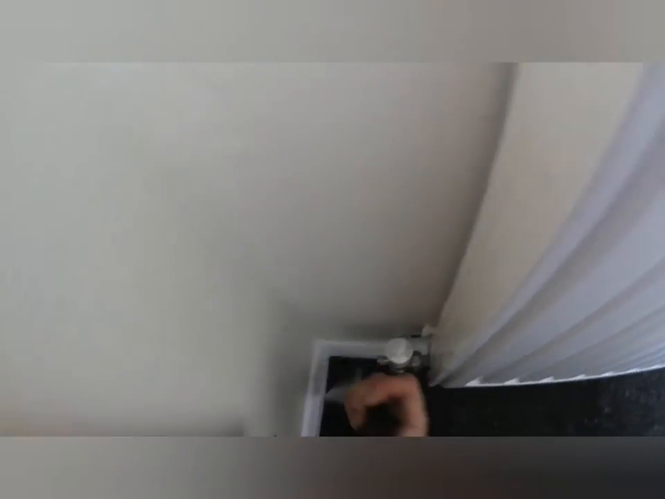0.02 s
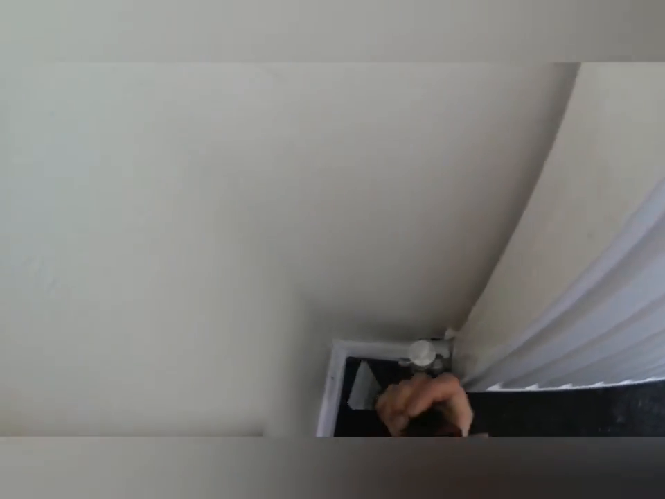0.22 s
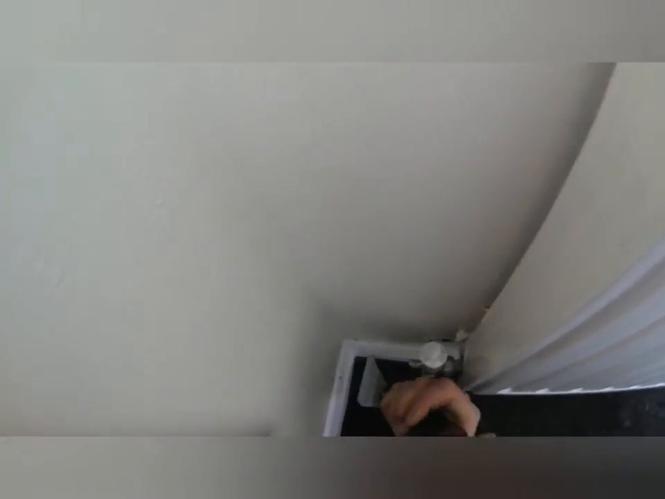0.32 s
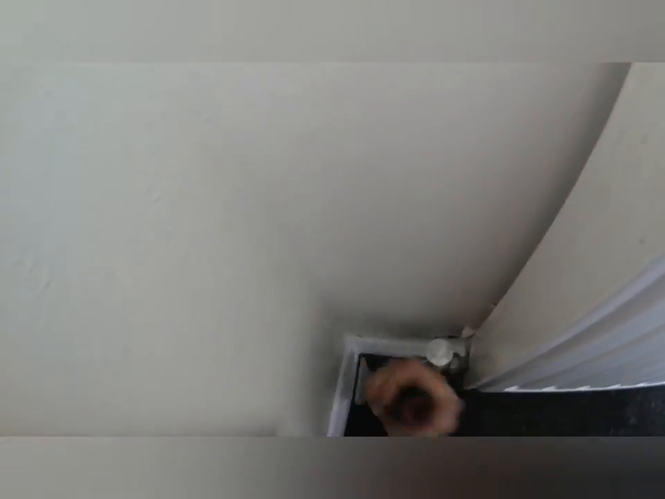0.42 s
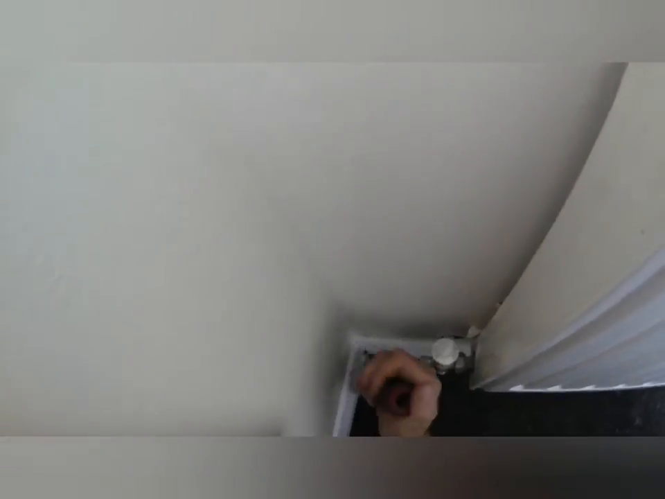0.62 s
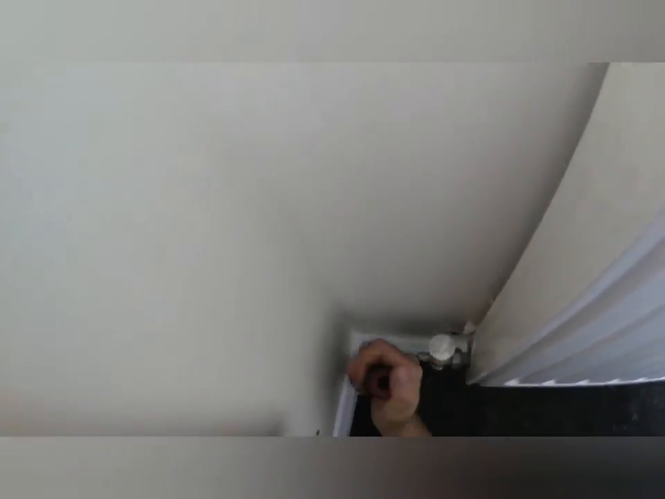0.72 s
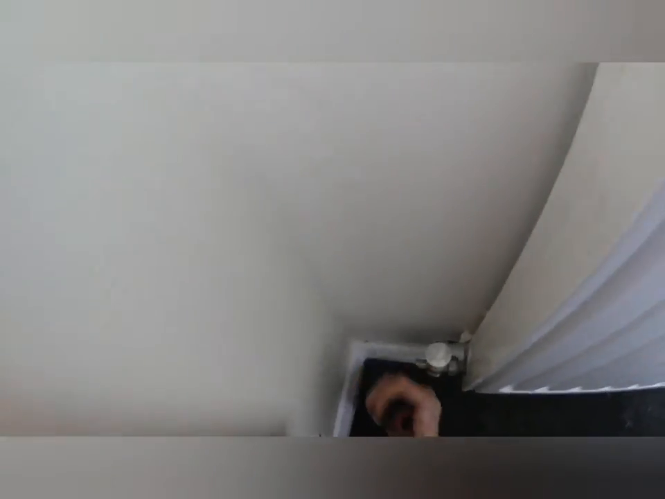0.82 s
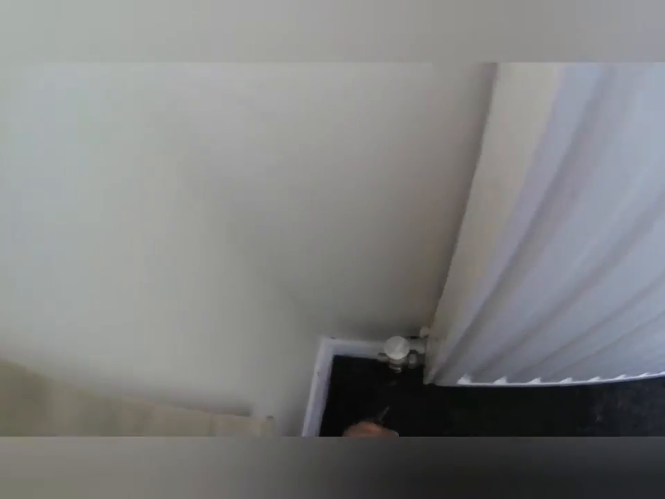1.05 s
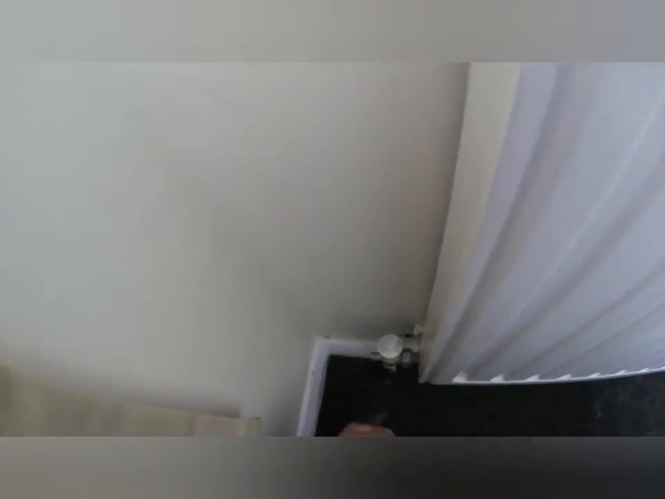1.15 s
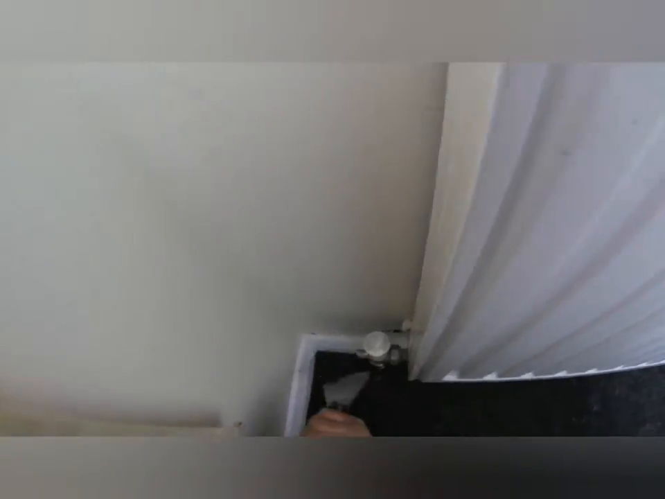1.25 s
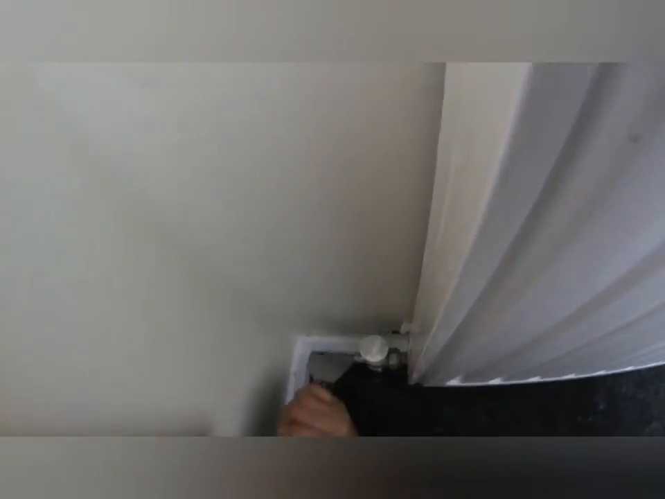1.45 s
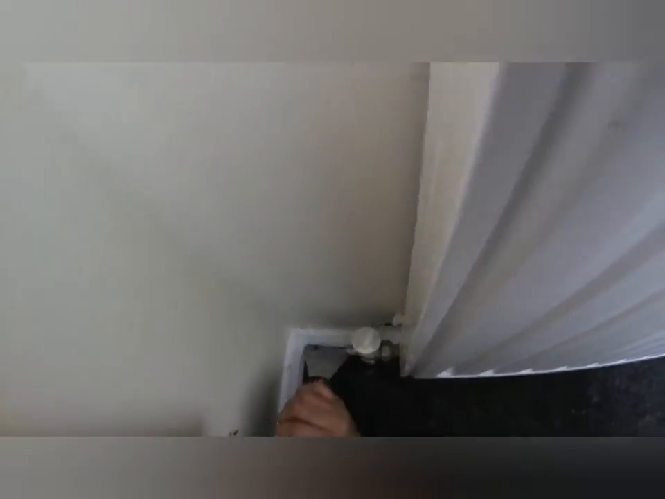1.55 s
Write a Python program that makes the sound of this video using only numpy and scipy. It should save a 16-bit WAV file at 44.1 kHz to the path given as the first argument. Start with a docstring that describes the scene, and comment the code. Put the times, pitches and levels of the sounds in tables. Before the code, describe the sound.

Dull thump of carpet pressed down beside a booming radiator, followed by a hard tool knock

```python
"""A hand shoves a carpet edge down in a corner: the floor shakes as noise in resonances, led by a judder,
and a steel radiator panel booms, a swelling 50 Hz sine with a noisy second mode.
A flat tool knocks, clicks and rings as decaying sines; its ticks and its scuff on the pile are shaped noise.
Behind them a microphone adds hiss, motor chatter, a thin wavering whine and low rumble from slow pushes."""
import sys
import numpy as np
from scipy.fft import rfft, irfft, next_fast_len
from scipy.io import wavfile
from scipy.ndimage import map_coordinates

SR = 44100
rng = np.random.default_rng(int(sys.argv[2]) if len(sys.argv) > 2 else 0)


def dump(signal):
    """Clip the signal to [-1, 1] and save it as 16-bit WAV at the path in sys.argv[1]."""
    limited = np.clip(np.atleast_2d(signal).T, -1, 1)
    pcm = np.round(limited * 32767).astype(np.int16)
    wavfile.write(sys.argv[1], SR, pcm)


N = 70560

# Hiss and chatter gain. Each row: time in seconds, shared gain in dB.
HISS_GAIN = [(0, -85.5), (.09, -84), (.16, -93.5), (.2, -94), (.3, -76), (.55, -79.5), (1, -84),
             (1.17, -82), (1.22, -80), (1.28, -85), (1.38, -80.5), (1.6, -82.5)]
# Hiss spectrum. Each row: frequency in Hz, relative density in dB.
HISS_COLOUR = [(410, -55), (700, 1.5), (1360, -5), (2320, -10), (8080, -19.5), (15700, -20.5)]
# Whine. Each row: time in seconds, mean level in dB.
WHINE_LEVEL = [(0, -88.5), (.5, -82), (1.06, -86), (1.11, -86), (1.6, -91)]
# Slow pushes on the microphone. Each row: time in seconds, level in dB.
SWAY_LEVEL = [(0, -50.5), (.05, -51), (.12, -55), (.17, -79), (.22, -34), (1.05, -57), (1.15, -43.5),
              (1.26, -64), (1.32, -46), (1.38, -61.5), (1.48, -50.5), (1.6, -61)]

# Rubbing on the pile. Each row: time in seconds, level in dB.
SCUFF_LEVEL = [(.06, -81), (.11, -97), (.158, -88), (.17, -54), (.205, -48.5), (.3, -51), (.325, -54),
               (.37, -56.5), (.44, -65), (.51, -64.5), (.56, -75.5), (.85, -72.5), (1.08, -87),
               (1.1, -48.5), (1.12, -66), (1.15, -45.5), (1.21, -60), (1.28, -73.5), (1.33, -70.5),
               (1.38, -82), (1.41, -66.5), (1.47, -65.5), (1.52, -62.5), (1.6, -72.5)]
# Scuff spectrum. Each row: frequency in Hz, relative density in dB.
PILE_COLOUR = [(500, -0.5), (800, 7.5), (1300, 2.5), (1600, -9), (2300, -19.5), (3800, -14.5), (4500, -28),
               (7000, -31), (10000, -45)]
# Tool ticks. Each row: start in seconds, bright level in dB, t60 in seconds, dull part in dB re bright.
TICKS = [(0.173, -50.5, 0.025, -11), (0.193, -54, 0.026, 12), (0.293, -45, 0.02, 8),
         (0.332, -49.5, 0.033, 4), (0.338, -39, 0.031, 5), (0.351, -38, 0.037, 5),
         (0.494, -57.5, 0.12, 8.5), (1.196, -50, 0.023, 9.5), (1.298, -58.5, 0.2, -3)]
# Bright part of a tick. Each row: frequency in Hz, relative density in dB.
GRIT_COLOUR = [(2200, -25), (2700, 0), (3200, -10.5), (3900, -0.5), (4600, -15.5), (5400, -3), (6300, -16),
               (9000, -20), (15700, -32)]
# Dull part of a tick. Each row: frequency in Hz, relative density in dB.
DULL_COLOUR = [(600, -4.5), (1450, -5.5), (1900, -11.5), (2400, -11.5)]
# Steel blade rings. Each row: start in seconds, level in dB.
PINGS = [(1.161, -62.5), (1.32, -78), (1.402, -75), (1.455, -75), (1.49, -75)]
# Blade modes. Each row: frequency in Hz, mean relative level in dB, t60 in seconds.
BLADE_MODES = [(3975, -3, .07), (6212, 0, .16)]
# Hard tool edge meets the board. Each row: start in seconds, level in dB.
CLICKS = [(.279, -48), (1.095, -48), (1.1578, -46), (1.159, -32.5), (1.199, -53)]
# Click modes. Each row: frequency in Hz, mean relative level in dB, t60 in seconds.
EDGE_MODES = [(1460, 2, .013), (3620, -4, .009), (4020, -9, .014), (5360, -6, .011), (7900, -15, .008),
              (9400, -23, .006), (11400, -23, .005), (14000, -29, .005)]
# Knocks on the skirting board. Each row: start in seconds, level in dB, fleshy part in dB re that level.
KNOCKS = [(.336, -34.5, -10), (.713, -52, -20), (1.093, -29, 4.5), (1.135, -41, -12), (1.1987, -38.5, 0),
          (1.2012, -39, 0), (1.395, -52.5, 20), (1.507, -51.5, 11.5), (1.518, -49, -15)]
# Skirting board modes. Each row: frequency in Hz, mean relative level in dB, t60 in seconds.
BOARD_MODES = [(711, 1.5, 0.022), (852, 6.5, 0.01), (1552, -3, 0.014), (1944, -8.5, 0.0092)]
# Pile and underlay modes. Each row: frequency in Hz, mean relative level in dB, t60 in seconds.
PAD_MODES = [(283, -9.5, 0.021), (334, -3, 0.043)]

# Lowest panel mode. Each row: time in seconds, level in dB.
BOOM_LEVEL = [(.195, -35), (.215, -30), (.26, -24), (.35, -20.5), (.44, -26), (.49, -35), (.6, -38.5),
              (.71, -40.5), (.84, -43), (.93, -49), (1.02, -47.5), (1.09, -63)]
# Floor shaking. Each row: time in seconds, low-mode level in dB, upper-mode level in dB.
SHAKE_LEVELS = [(0, -59.5, -79), (.06, -59, -64.5), (.12, -64, -75.5), (.163, -75, -78), (.168, -40.5, -46),
                (.2, -38.5, -41), (.235, -31.5, -34.5), (.265, -36.5, -36), (.3, -34, -43.5),
                (.36, -44, -36), (.41, -36, -46), (.45, -50.5, -46), (.495, -49, -52.5),
                (.54, -48.5, -53.5), (.57, -53, -65.5), (.72, -52, -59), (.8, -61, -63.5), (1.09, -70, -71),
                (1.098, -54, -42.5), (1.136, -42.5, -45), (1.21, -47.5, -47.5), (1.28, -58, -63.5),
                (1.37, -61.5, -65.5), (1.43, -62, -56), (1.52, -62.5, -62.5), (1.6, -60.5, -67)]
# Low floor modes. Each row: frequency in Hz, width in Hz, relative gain in dB.
LOW_MODES = [(123.4, 19, -4), (149.2, 14.1, 0), (165.2, 19, -2), (213, 25.6, -5)]
# Upper floor modes. Each row: frequency in Hz, width in Hz, relative gain in dB.
UPPER_MODES = [(251.5, 42.4, -1.5), (297.5, 21.5, 2), (347, 19.6, -2.5), (417.5, 42.4, -1.5),
               (471, 91, -6.5), (632, 116, -6), (717, 94, -10)]
# The backing judders as the shove begins. Each row: time in seconds, level in dB.
JUDDER_LEVEL = [(.165, -41), (.2, -37.5), (.24, -49), (.3, -51)]

HISS_DB, CHATTER_DB = 11, -8  # re the shared gain
CHATTER_HZ, CHATTER_WIDTH_HZ, PULSES_PER_S = 6050, 300, 59
WHINE_HZ, TOP_HZ = 11130, 15770
BOOM_HZ = 50
SECOND_HZ, SECOND_WIDTH_HZ, SECOND_DB = 86.7, 9.7, 1.1  # width per pass of two; dB re low floor modes
JUDDER_HZ, JUDDER_WIDTH_HZ = 514, 246  # width per pass of two


def amp(db):
    """Amplitude of a level in dB."""
    return 10 ** (np.asarray(db) / 20)


def unit(x):
    """Scale to rms 1."""
    return x / np.sqrt(np.mean(x ** 2) + 1e-20)


def clock_s():
    """Time of each sample in seconds."""
    return np.arange(N) / SR


def curves(rows):
    """One value per sample for each column after the time."""
    time_s, *columns = np.transpose(rows)
    return [np.interp(clock_s(), time_s, column) for column in columns]


def wobble(knots_per_s):
    """Smooth random curve through normal knots."""
    knots = rng.standard_normal(int(N * knots_per_s / SR) + 4)
    return map_coordinates(knots, [np.arange(N) * knots_per_s / SR])


def filtered(x, response):
    """Apply a complex response of frequency, zero-padded."""
    size = next_fast_len(N + SR // 2)
    spectrum = rfft(x, size) * response(np.fft.rfftfreq(size, 1 / SR))
    return irfft(spectrum, size)[..., :N]


def colour(points):
    """Gain through (Hz, dB) points over log frequency, -120 dB outside them."""
    points_hz, db = np.transpose(points)
    return lambda hz: amp(np.interp(np.log(hz + 1), np.log(points_hz + 1), db, -120, -120))


def resonances(peaks):
    """Causal sum of second-order resonances of alternating sign."""
    def response(f):
        total = 0
        for k, (hz, width_hz, db) in enumerate(peaks):
            damping = 1j * f * width_hz
            total = total + (-1) ** k * amp(db) * damping / (hz * hz - f * f + damping)
        return total
    return response


def noise(response, rough_db=0, knots_per_s=100):
    """Noise made lumpy by a random gain, filtered, rms 1."""
    lumpy = rng.standard_normal(N) * amp(rough_db * wobble(knots_per_s))
    return unit(filtered(lumpy, response))


def strikes(events, modes, attack_s):
    """Each blow rings the same decaying modes at fresh random levels."""
    out, t = np.zeros(N + SR), np.arange(SR // 3) / SR
    attack = 1 - np.exp(-(t / attack_s) ** 2)
    spread_db = 2 * rng.standard_normal((len(events), len(modes)))
    for (start_s, db), offsets_db in zip(events, spread_db):
        ring = 0
        for (hz, mode_db, t60_s), offset_db in zip(modes, offsets_db):
            decay = amp(mode_db + offset_db - 60 * t / t60_s)
            ring = ring + decay * np.sin(2 * np.pi * hz * t)
        out[round(start_s * SR):][:len(t)] += amp(db) * ring * attack
    return out[:N]


def hiss_and_chatter():
    """Coloured hiss and pulsed resonant motor noise rise and sink on one gain curve."""
    pulses = np.exp(3 * np.cos(2 * np.pi * PULSES_PER_S * clock_s()))
    buzz = noise(resonances([(CHATTER_HZ, CHATTER_WIDTH_HZ, 0)]))
    chatter = amp(CHATTER_DB) * unit(pulses * buzz)
    hiss = amp(HISS_DB) * noise(colour(HISS_COLOUR), rough_db=.8, knots_per_s=30)
    return amp(curves(HISS_GAIN)[0]) * (hiss + chatter)


def whine():
    """Thin sine, wavering in level and phase."""
    level_db = curves(WHINE_LEVEL)[0] + 2 * wobble(70)
    phase = 2 * np.pi * WHINE_HZ * clock_s() + .5 * wobble(50)
    return np.sqrt(2) * amp(level_db) * np.sin(phase)


def microphone_sway():
    """Slow pushes rock the microphone: noise at 10 to 130 Hz."""
    rumble = noise(colour([(10, -5.0), (30, -8), (100, -16), (130, -38.0)]))
    return amp(curves(SWAY_LEVEL)[0]) * rumble


def scuff():
    """Rubbing on the pile: lumpy coloured noise."""
    return amp(curves(SCUFF_LEVEL)[0]) * noise(colour(PILE_COLOUR), rough_db=3.5, knots_per_s=140)


def tool_ticks():
    """Gritty contacts: short decays of bright and dull noise."""
    bright, dull = np.zeros(N), np.zeros(N)
    for start_s, db, t60_s, dull_db in TICKS:
        age = np.clip(clock_s() - start_s, 0, None) / t60_s
        envelope = amp(db - 60 * age) * (1 - np.exp(-age / 0.14))
        bright += envelope
        dull += amp(dull_db) * envelope
    grit = bright * noise(colour(GRIT_COLOUR), rough_db=1.5, knots_per_s=780)
    return grit + dull * noise(colour(DULL_COLOUR), rough_db=1.5, knots_per_s=190)


def blade_pings():
    """Steel modes ring; the grip damps them unevenly."""
    return amp(4.5 * wobble(150)) * strikes(PINGS, BLADE_MODES, attack_s=0.00092)


def tool_knocks():
    """Blows ring the board, with fleshy thuds in pile and underlay and clicks of the tool's hard edge."""
    board = -strikes([(s, db) for s, db, _ in KNOCKS], BOARD_MODES, attack_s=.0006)  # inverted polarity
    thuds = strikes([(s, db + soft_db) for s, db, soft_db in KNOCKS], PAD_MODES, attack_s=0.0028)
    clicks = strikes(CLICKS, EDGE_MODES, attack_s=0.00031)
    return board + thuds + clicks


def radiator():
    """Lowest panel mode swells after the shove and dies slowly; a noisy second mode follows the floor."""
    start_s, end_s = BOOM_LEVEL[0][0], BOOM_LEVEL[-1][0]
    t = clock_s()
    fade = np.clip((t - start_s) / .01, 0, 1) * np.clip((end_s - t) / .02, 0, 1)
    boom = np.sqrt(2) * amp(curves(BOOM_LEVEL)[0]) * np.sin(2 * np.pi * BOOM_HZ * (t - start_s))
    mode = resonances([(SECOND_HZ, SECOND_WIDTH_HZ, 0)])
    second = amp(curves(SHAKE_LEVELS)[0] + SECOND_DB) * noise(lambda f: mode(f) ** 2)
    return fade * (boom + second)


def judder():
    """Backing judders at the start of the shove: noise through one resonance twice."""
    begun = np.clip((clock_s() - JUDDER_LEVEL[0][0]) / .002, 0, 1)
    mode = resonances([(JUDDER_HZ, JUDDER_WIDTH_HZ, 0)])
    level_db = curves(JUDDER_LEVEL + [(.4, -100)])[0]  # dies away by 0.4 s
    return begun * amp(level_db) * noise(lambda f: mode(f) ** 2)


def floor():
    """Boards shaken by the hand: lumpy noise in low and upper resonances."""
    def steep(peaks, half_gain_hz):
        modes = resonances(peaks)
        return lambda f: modes(f) / (1 + (f / half_gain_hz) ** 4)

    low_db, upper_db = curves(SHAKE_LEVELS)
    low = amp(low_db) * noise(steep(LOW_MODES, 218), rough_db=3.05, knots_per_s=30)
    upper = amp(upper_db) * noise(steep(UPPER_MODES, 620), rough_db=1.54, knots_per_s=80.62)
    return low + upper


def scene():
    """Sum of all sources, the same in both channels."""
    background = hiss_and_chatter() + whine() + microphone_sway()
    tool = scuff() + tool_ticks() + blade_pings() + tool_knocks()
    shove = radiator() + judder() + floor()
    mono = background + tool + shove
    return np.array([mono, mono])


def record(dry):
    """Nothing passes above the band limit."""
    return filtered(dry, lambda hz: hz < TOP_HZ)


dry = scene()
out = record(dry)
dump(out)
```